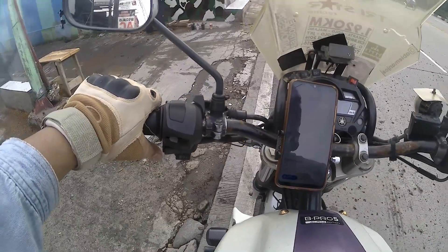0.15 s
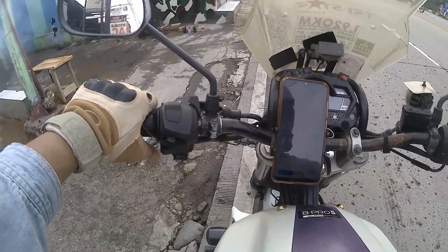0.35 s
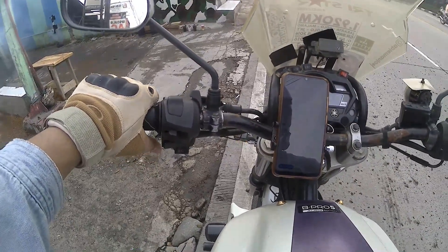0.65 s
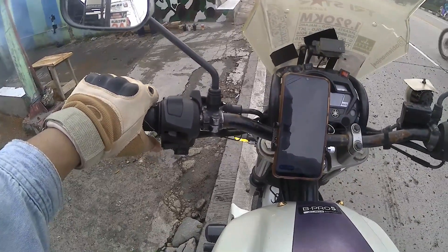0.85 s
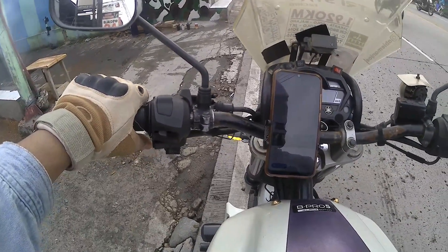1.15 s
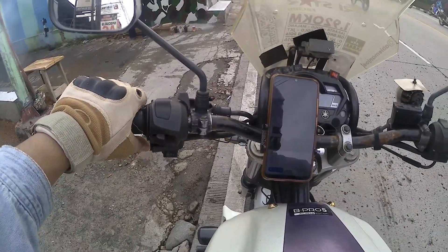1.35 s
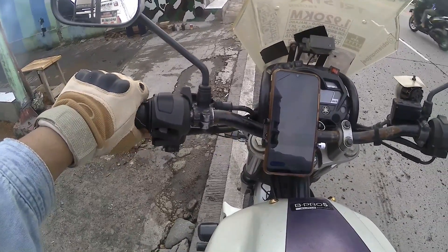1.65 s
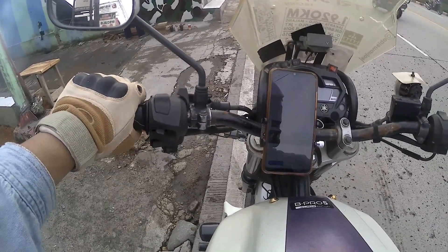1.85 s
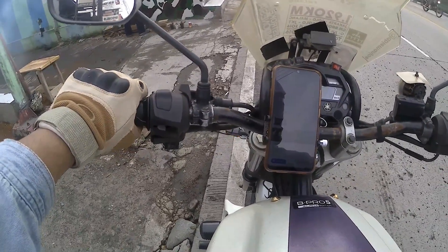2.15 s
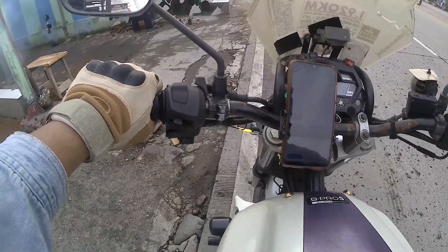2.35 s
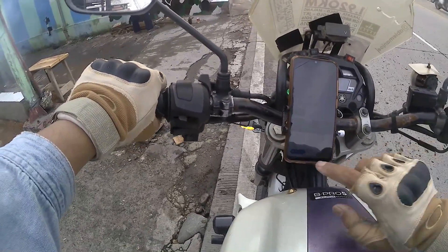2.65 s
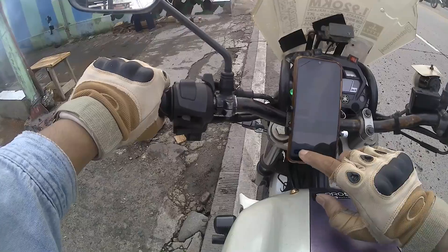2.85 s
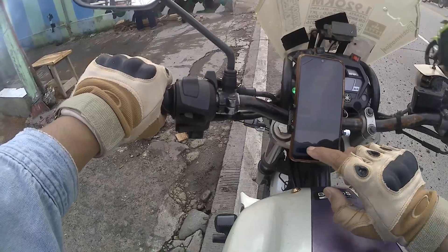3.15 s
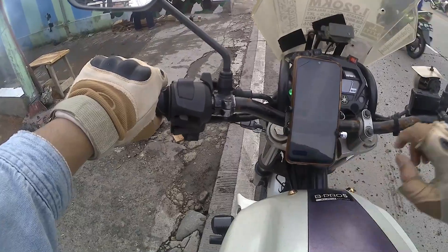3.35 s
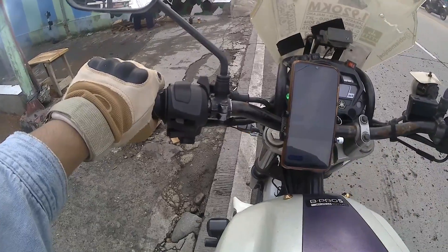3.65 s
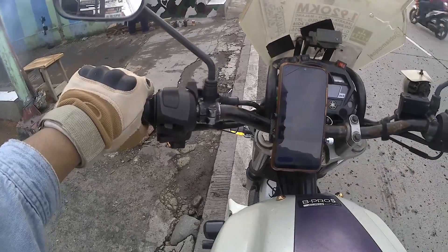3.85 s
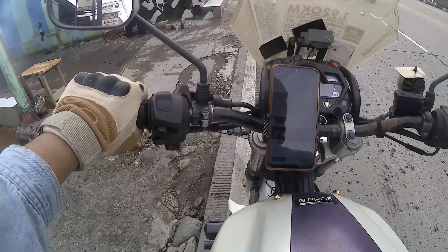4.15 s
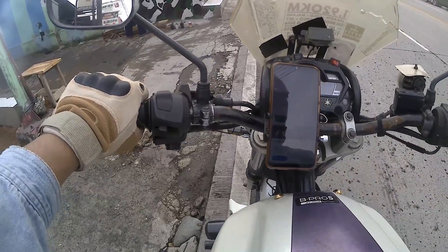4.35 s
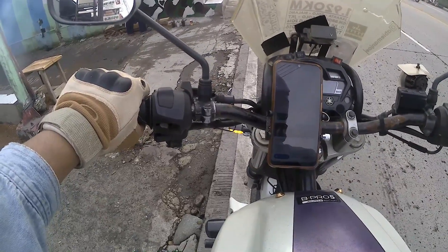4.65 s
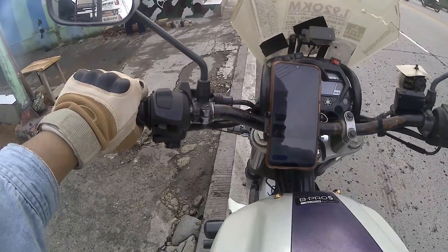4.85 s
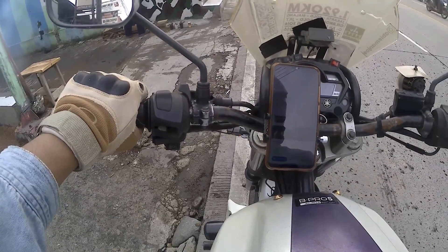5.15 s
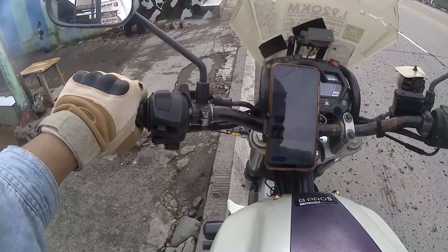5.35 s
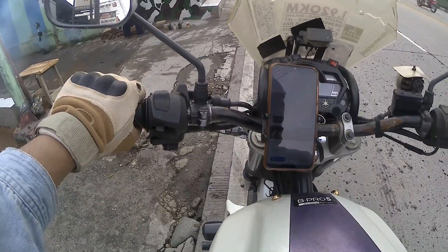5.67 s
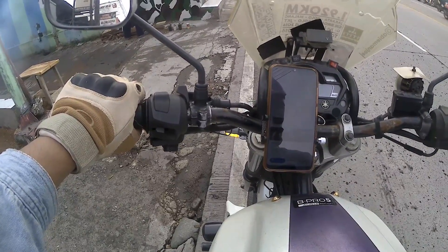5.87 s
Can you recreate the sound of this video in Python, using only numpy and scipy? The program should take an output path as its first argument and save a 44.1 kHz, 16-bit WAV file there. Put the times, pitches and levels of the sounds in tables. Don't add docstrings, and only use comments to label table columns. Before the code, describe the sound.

Beside a road, two motorcycles go past close, one barking fast, one snapping slower and speeding up. The bike under the microphone is blipped, then sags to a slow, slack idle and finally picks up. Farther engines hum and boom, a faint gear whine climbs, and tyres wash by. Helmet camera sound, dull and gritty, with little clear treble.

```python
import sys
import numpy as np
from scipy import signal
from scipy.fft import rfft, irfft
from scipy.io import wavfile
from scipy.ndimage import uniform_filter1d, map_coordinates

SR = 44100
rng = np.random.default_rng(int(sys.argv[2]) if len(sys.argv) > 2 else 0)


def elevation(decibels):
    levels = np.asarray(decibels, float)
    return 10 ** (levels / 20)


def file_out(sig):
    cols = np.atleast_2d(sig).T
    lim = np.clip(cols, -1, 1)
    pcm = np.round(lim * 32767).astype(np.int16)
    wavfile.write(sys.argv[1], SR, pcm)


N = 264996

# (frequency [Hz], density [dB per Hz])
RUMBLE_COLOUR = [(20, -3), (40, 1.5), (60, -2.5), (95, -5), (150, 0), (220, -6), (400, -20), (800, -50)]
ROAD_COLOUR = [(150, 0), (220, 0), (300, -4), (440, -4), (730, -14), (990, -17), (1150, -21.5), (1500, -27),
               (2030, -30), (3080, -37.5), (3700, -40), (4800, -75)]
# (rumble [dB], roar [dB], tyre hiss [dB])
ROAD_REST_DB = (-27, -45.5, -38.5)
# (nearest time [s], distance over speed [s], rumble [dB], roar [dB], tyre hiss [dB])
PASSES = [
    (.45, 0.38, -23.5, -29, -32.5),
    (1.5, 0.45, -27, -31, -41.5),
    (2.15, 0.2, -41, -28.5, -40),
    (3, 0.34, -35.5, -44, -33.5),
    (3.85, 0.86, -26.5, -36, -38.5),
    (6, 0.18, -37, -38, -47.5),
]

# (start [s], length [s], gear mesh [Hz], climb [Hz per s], level [dB])
GEAR_CLIMBS = [
    (1.98, .14, 1016, 50, -38),
    (2.2, .52, 1022, 72, -37),
    (2.71, .4, 1012, 95, -29),
    (3.16, .5, 1006, 25, -36),
]
# (time [s], firing rate [per s])
NEARING_SPEED = [(2.2, 51.3), (2.616, 52.5), (2.998, 55.0), (3.16, 55.4), (3.27, 56.6), (3.33, 56.4),
                 (3.448, 52.5), (3.58, 47.8), (3.83, 47.6)]
# (multiple [1], level [dB])
NEARING_ORDERS = [(4, -3), (5, -10), (6, -14), (7, -2), (8, -3), (9, -2), (10, -6), (11, -12), (16, -13),
                  (17, -17), (18, -20)]
BOOMING_ORDERS = [(2, -4.5), (3, -6.5), (5, -5), (6, -16), (7, -9), (8, -2), (9, -2), (10, -10), (11, -10),
                  (12, -13)]
# (time [s], firing rate [per s], nearness [dB])
BOOMING_SPEED = [(1.9, 40, -37), (2.3, 38.9, -39), (3.3, 39.8, -39), (3.55, 38.8, -36), (3.74, 44, -33),
                 (4.26, 41.5, -33), (4.46, 38, -42), (4.75, 39.4, -43), (5.3, 39, -44)]
# (time [s], half length [s], level [dB])
BOOMS = [(2.387, 0.084, -39), (2.668, 0.048, -27), (2.878, 0.049, -26), (3.47, 0.15, -23),
         (4.01, 0.26, -24.5), (4.43, 0.12, -21.5), (4.63, 0.08, -16), (5.032, 0.18, -27)]

# (time [s], firing rate [per s])
FAST_SPEED = [(-.0098, 45.73), (0, 45.73), (.256, 47.14), (.511, 47.89), (.767, 47.64), (1.1, 47.21),
              (1.533, 47.67), (2, 47.25), (2.3, 46.85)]
SLOW_SPEED = [(-.0356, 22.71), (0, 22.71), (.333, 23.57), (.667, 24.42), (1, 25.17), (1.333, 26.11),
              (1.667, 26.77), (2, 29.59)]
STANDING_SPEED = [(-.0568, 13.18), (0, 13.18), (.6, 14.8), (.8, 15.94), (1, 15.01), (1.2, 17.17),
                  (1.4, 16.45), (1.6, 17.65), (2.2, 25.14), (2.4, 22.98), (2.6, 18.28), (3.2, 12.96),
                  (3.41, 9.79), (3.81, 8.64), (5.01, 10.33), (5.61, 12.36), (5.81, 13.59), (6.01, 18.12)]
# (time [s], puff peak [dB])
FAST_EFFORT = [(0, -21), (.27, -14), (.55, -9.5), (.72, -10), (1.05, -13), (2, -15.5), (2.3, -6)]
SLOW_EFFORT = [(0, -6), (.3, -3), (.65, -4.5), (1, -7), (1.35, -6.5), (2, -8)]
STANDING_EFFORT = [(0, -11), (.75, -6.5), (1.3, -16.5), (1.85, -10.5), (2.14, -18.5), (2.29, -7),
                   (2.7, -11.5), (3.2, -19.5), (4.3, -18.5), (4.62, -14.5), (5.55, -16), (5.75, -10.5),
                   (6.01, -7.5)]
# (frequency [Hz], level [dB])
RASP_COLOUR = [(150, -1), (300, -19.5), (600, 15), (1000, 5), (1500, -13), (2500, -39.5), (3700, -34)]

CAMERA_RATE, FILE_RATE = 8000, 48000


def evened(x):
    return x / np.sqrt(np.mean(x ** 2) + 1e-20)


def read(points, hz):
    f, value = np.transpose(points)
    return np.interp(np.log(hz + 1), np.log(f + 1), value)


def columns(rows, fade_s):
    s, *values = np.transpose(rows)
    t = np.arange(N) / SR
    gate = np.clip(np.minimum(t - s[0], s[-1] - t) / fade_s, 0, 1)
    return gate, *(np.interp(t, s, v) for v in values)


def wander(per_s):
    knots = rng.standard_normal(int(N / SR * per_s) + 2)
    return evened(np.interp(np.arange(N) / SR * per_s, np.arange(len(knots)), knots))


def coloured(points):
    hz = np.fft.rfftfreq(N, 1 / SR)
    level_db = read(points, hz) - 60 * (hz > points[-1][0])
    return evened(irfft(rfft(rng.standard_normal(N)) * elevation(level_db), N))


def passing():
    t = np.arange(N) / SR
    power = elevation(np.array(ROAD_REST_DB))[:, None] ** 2
    for nearest_s, scale_s, *db in PASSES:
        power = power + elevation(np.array(db))[:, None] ** 2 / (1 + ((t - nearest_s) / scale_s) ** 2)
    return np.sqrt(power)


def road():
    frames = N // 256 + 5
    a, b, patches = rng.standard_normal((frames, 513, 3)).T
    patches = evened(uniform_filter1d(uniform_filter1d(patches, 8, 0), 8, 1))
    flicker = evened(uniform_filter1d(rng.standard_normal(frames), 3))
    z = (a + 1j * b) * elevation(1.32 * patches + 0.4 * flicker)
    wash = rfft(signal.istft(z, nperseg=1024, noverlap=768)[1][:N])

    hz = np.fft.rfftfreq(N, 1 / SR)
    colour = elevation(read(ROAD_COLOUR, hz))
    low = 1 / (1 + (hz / 220) ** 4)
    high = 1 / (1 + (800 / (hz + 1)) ** 4)
    rumble, roar, hiss = elevation(read(RUMBLE_COLOUR, hz)), colour * (1 - low - high), colour * high
    return sum(gain * evened(irfft(wash * share, N))
               for gain, share in zip(passing(), (rumble, roar, hiss)))


def orders(per_s, table, drift_db, drift_per_s, slip):
    turns = np.cumsum(per_s) / SR
    out = 0
    for multiple, db in table:
        level = np.sqrt(2) * elevation(db + drift_db * wander(drift_per_s))
        phase = round(multiple) * turns + rng.random() + slip * wander(drift_per_s)
        out = out + level * np.cos(2 * np.pi * phase)
    return out


def gears():
    t, out = np.arange(N) / SR, 0
    rise_s, sink_db_per_s = .07, -22
    for start, length, hz, climb, db in GEAR_CLIMBS:
        u = np.clip(t - start, 0, length)
        gate = np.clip(np.minimum(u, length - u) / rise_s, 0, 1)
        whine = orders(hz + climb * u, [(1, -.5)], drift_db=2.5, drift_per_s=28, slip=.17)
        out = out + gate * elevation(db + sink_db_per_s * u) * whine
    return out


def nearing_engine():
    gate, per_s = columns(NEARING_SPEED, fade_s=0.13)
    start_db, nearing_db_per_s = -40, 6
    level = elevation(start_db + nearing_db_per_s * (np.arange(N) / SR - NEARING_SPEED[0][0]))
    return gate * level * orders(per_s, NEARING_ORDERS, drift_db=2.5, drift_per_s=12, slip=.11)


def booming_engine():
    t = np.arange(N) / SR
    gate, per_s, near_db = columns(BOOMING_SPEED, fade_s=0.082)
    boom = elevation(-44.5)
    for s, half_s, db in BOOMS:
        boom = boom + elevation(db) * np.exp(-((t - s) / half_s) ** 2)
    hum = elevation(near_db) * orders(per_s, BOOMING_ORDERS, drift_db=2.5, drift_per_s=9, slip=.1)
    fourth = orders(4 * per_s, [(1, -.5)], drift_db=.7, drift_per_s=12, slip=.05)
    return gate * (hum + boom * fourth)


def far_traffic():
    return nearing_engine() + booming_engine() + gears()


def exhaust(rows, effort, start_hz, end_hz, glide_s, rise_s, fall_s, lag_s, sign, snap, puff_db,
            rasp_db, rasp_s, leave_s, echo=0, echo_s=0):
    per_s, peak_db = columns(rows, fade_s=1)[1], columns(effort, fade_s=1)[1]
    away = np.clip((rows[-1][0] - np.arange(N) / SR) / leave_s, 0, 1)
    turns = np.cumsum(per_s) / SR - rows[0][0] * rows[0][1]
    fired = np.flatnonzero(np.diff(np.floor(turns)) > 0)
    uneven_db = rng.standard_normal(len(fired))
    blows = np.zeros(N)
    blows[fired] = elevation(peak_db[fired] + uneven_db) * away[fired]

    t = np.arange(-2048, 2049) / SR - lag_s
    glide = np.where(t > 0, glide_s * (1 - np.exp(-abs(t) / glide_s)), t)
    cycles = end_hz * t + (start_hz - end_hz) * glide
    swell = np.where(t > 0, np.exp(-(t / fall_s) ** 2), np.exp(-(t / rise_s) ** 2))
    puff = sign * swell * np.cos(2 * np.pi * cycles)
    front = np.exp(-(t / .00035) ** 2)
    ring = .25 * (t > 0) * np.exp(-abs(t) / .002) * np.sin(2 * np.pi * 560 * t)
    puff = puff + sign * snap * (front - ring)
    puff = puff + echo * np.roll(puff, round(echo_s * SR))

    spurt = np.where(t > 0, np.exp(-abs(t) / rasp_s), np.exp(-(t / .0006) ** 2))
    rasp = signal.oaconvolve(blows, spurt, "same") * coloured(RASP_COLOUR)
    return elevation(puff_db) * signal.oaconvolve(blows, puff, "same") + elevation(rasp_db) * rasp


def passing_bikes():
    fast = exhaust(FAST_SPEED, FAST_EFFORT, start_hz=250, end_hz=82, glide_s=.0032, rise_s=.0011,
                   fall_s=.012, lag_s=-.0002, sign=-1, snap=1.05, puff_db=-.5,
                   rasp_db=-19, rasp_s=.005, leave_s=.4)
    slow = exhaust(SLOW_SPEED, SLOW_EFFORT, start_hz=270, end_hz=480, glide_s=.0008, rise_s=.0026,
                   fall_s=.0019, lag_s=.0002, sign=1, snap=.9, puff_db=-8.5,
                   rasp_db=-17, rasp_s=.005, leave_s=.3, echo=.4, echo_s=.0101)
    return fast + slow


def standing_bike():
    idle_thump = exhaust(STANDING_SPEED, STANDING_EFFORT, start_hz=92, end_hz=66, glide_s=.009, rise_s=.0105,
                    fall_s=.012, lag_s=.001, sign=-1, snap=0, puff_db=-.5,
                    rasp_db=-35, rasp_s=.012, leave_s=.001)
    revved_thump = exhaust(STANDING_SPEED, STANDING_EFFORT, start_hz=102, end_hz=88, glide_s=.01, rise_s=.011,
                    fall_s=.013, lag_s=0, sign=1, snap=0, puff_db=-1.5,
                    rasp_db=-35, rasp_s=.012, leave_s=.001)
    idle_per_s, revved_per_s = 14, 21
    per_s = columns(STANDING_SPEED, fade_s=1)[1]
    revved = np.clip((per_s - idle_per_s) / (revved_per_s - idle_per_s), 0, 1)
    return np.sqrt(1 - revved) * idle_thump + np.sqrt(revved) * revved_thump


def scene():
    return (road() + far_traffic() + passing_bikes() + standing_bike())[None]


def starved(x):
    hz, t, z = signal.stft(x, CAMERA_RATE, nperseg=320)
    edge_hz = np.repeat(rng.uniform(3600, 4050, len(t)), 2)[:len(t)]
    chance = np.repeat(rng.random((len(t), len(hz))).T, 2, 0)[:len(hz)]
    lost = (hz[:, None] > edge_hz) & (chance > .13)
    return signal.istft(z * np.where(lost, elevation(-36), 1), CAMERA_RATE, nperseg=320)[1][:len(x)]


def low_pass(x):
    return signal.sosfilt(signal.butter(12, 15880, fs=SR, output="sos"), x)


def record(dry):
    x = signal.sosfiltfilt(signal.butter(2, 33, "high", fs=SR, output="sos"), dry[0])
    x = np.pad(x, (0, 441), "reflect")
    x = signal.oaconvolve(x, signal.firwin(71, 3760, window=("kaiser", 4.5), fs=SR), "same")
    coarse = map_coordinates(x, [np.arange(0, len(x) - 1, SR / CAMERA_RATE)], order=3)
    coarse = starved(1.9 * np.tanh(coarse / 1.9))
    step = FILE_RATE // CAMERA_RATE
    joined = np.interp(np.arange(len(coarse) * step) / step, np.arange(len(coarse)), coarse)
    joined = signal.resample_poly(joined, 147, 160)[:N]
    joined = signal.sosfilt(signal.butter(2, 16000, fs=SR, output="sos"), joined)
    joined = joined * np.clip((N - np.arange(N)) / 300, 0, 1)
    return low_pass(joined[None])


dry = scene()
out = record(dry)
file_out(out)
```